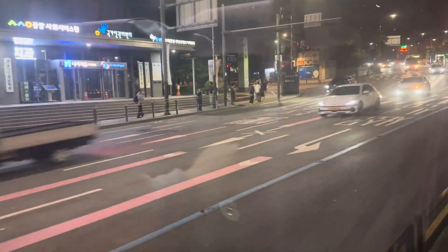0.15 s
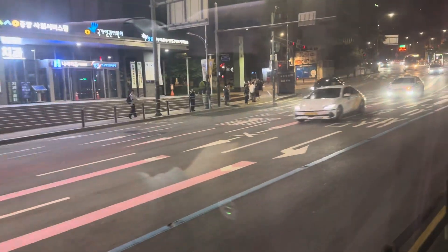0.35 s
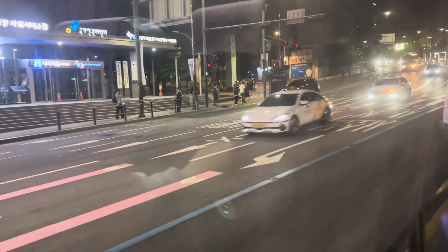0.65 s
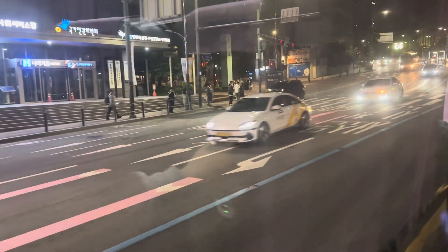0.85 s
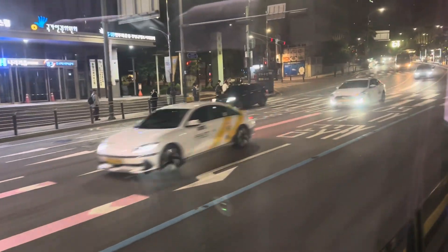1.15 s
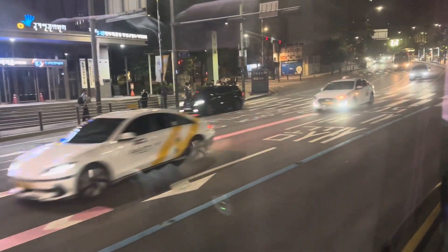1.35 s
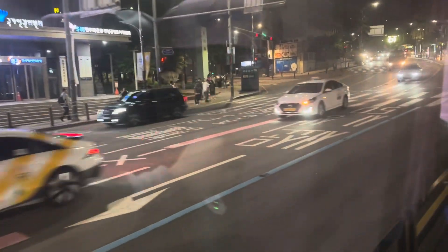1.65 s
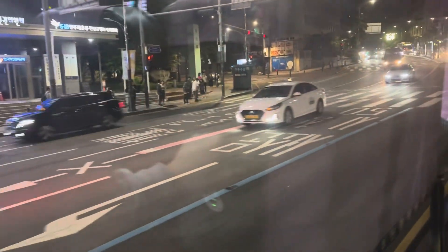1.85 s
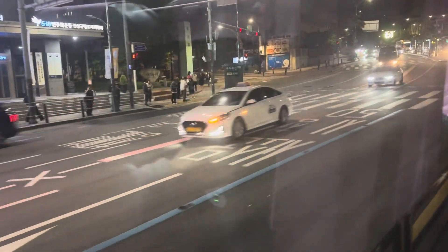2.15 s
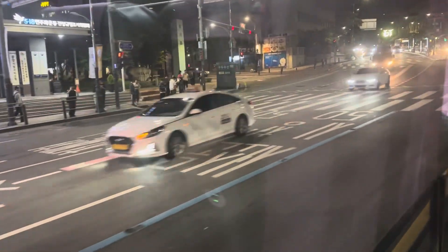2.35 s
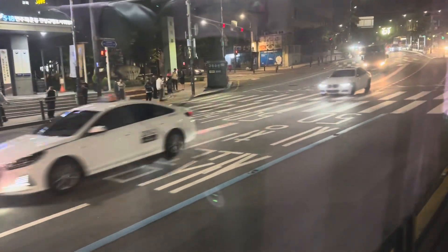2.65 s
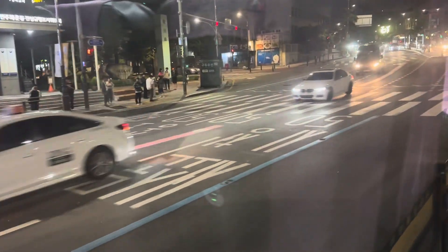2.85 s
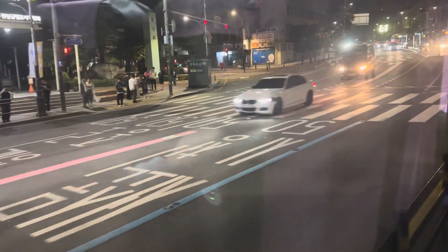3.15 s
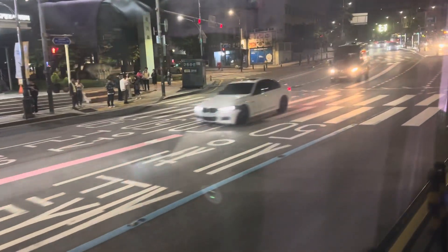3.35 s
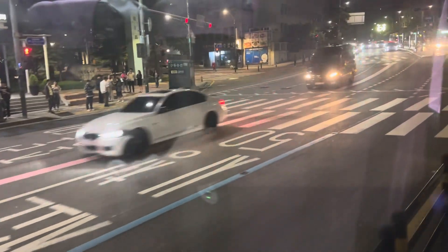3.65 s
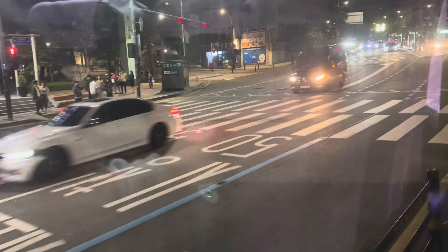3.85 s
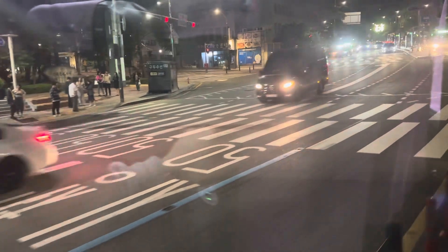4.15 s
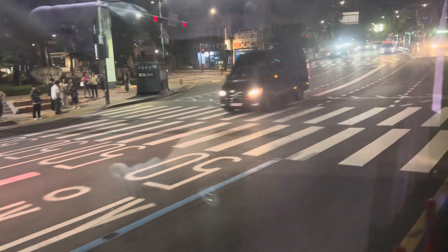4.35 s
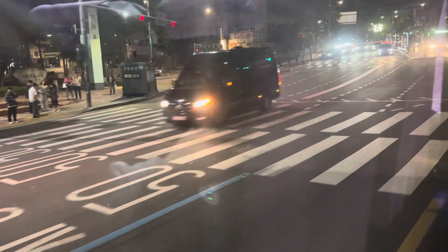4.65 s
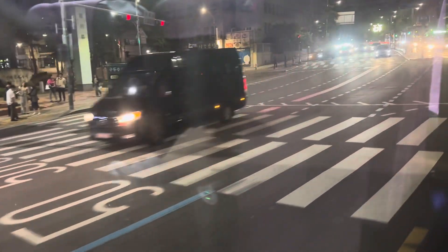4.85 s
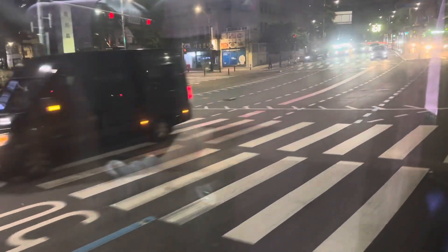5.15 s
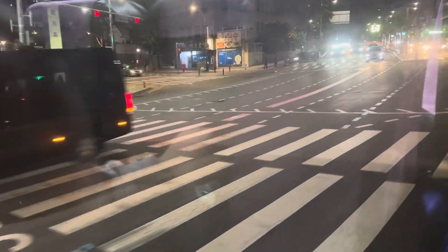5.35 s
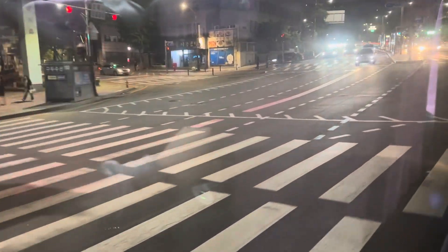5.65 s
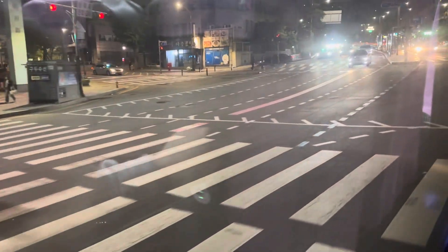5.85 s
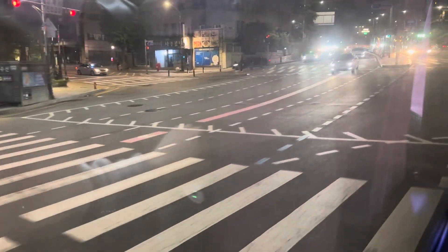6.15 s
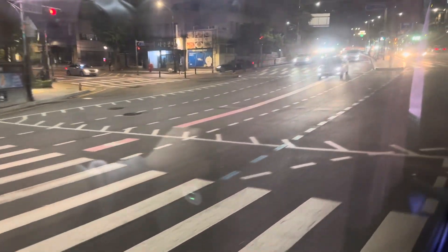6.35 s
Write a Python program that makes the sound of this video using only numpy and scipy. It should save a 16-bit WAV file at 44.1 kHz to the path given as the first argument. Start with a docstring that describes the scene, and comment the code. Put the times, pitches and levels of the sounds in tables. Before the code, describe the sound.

Inside a city bus, a diesel engine pulls hard with faint turbo whistle, changes gear with a breathy air release, then climbs again more quietly.

```python
"""A bus diesel pulls hard with its turbo whistling, changes gear with a rush of air, then climbs in the next gear.
Its tones are sines locked to the crank; its roar, clatter and hiss are coloured noise that follows the load.
The turbo is a narrow band of noise on a moving pitch, and the vented air is noise with sung tones.
Road rumble and cabin boom are low noise; fittings tick in noise bursts, panels knock in decaying modes,
and squeaks, whines and standing waves are wavering sines."""
import sys
import numpy as np
from scipy import signal
from scipy.fft import rfft, irfft
from scipy.io import wavfile
from scipy.ndimage import uniform_filter1d

SR = 44100
rng = np.random.default_rng(int(sys.argv[2]) if len(sys.argv) > 2 else 0)


def materialize(psi):
    """Save the field psi as 16-bit PCM at rate SR to the path in sys.argv[1].

    A 1-D psi becomes a single channel; in a 2-D psi each row is a channel.
    """
    bounded = np.clip(np.atleast_2d(psi).T, -1, 1)
    quanta = np.round(bounded * 32767).astype(np.int16)
    wavfile.write(sys.argv[1], SR, quanta)


N = 287091
TIME = np.arange(N) / SR
BINS_HZ = np.maximum(np.arange(N // 2 + 1) * SR / N, 1)


def from_db(db):
    """Decibels to gain."""
    return np.exp(np.log(10) / 20 * np.asarray(db))


def rms_one(x):
    """Scale so that the centre of the stereo image has rms 1."""
    centre = np.atleast_2d(x).mean(axis=0)
    return x / np.sqrt(np.mean(centre ** 2) + 1e-20)


def in_time(rows):
    """Each column of a curve, at every sample."""
    s, *columns = np.transpose(rows)
    return [np.interp(TIME, s, column) for column in columns]


def at_hz(points, hz):
    """Read a spectrum on a log-frequency axis."""
    point_hz, value = np.transpose(points)
    return np.interp(np.log(hz), np.log(point_hz), value)


def drift(rate_hz):
    """Slow random wander of rms 1, drawn at every 16th sample."""
    coarse = TIME[::16]
    hz = np.arange(len(coarse) // 2 + 1) * SR / N
    spectrum = rfft(rng.standard_normal(len(coarse))) / (1 + (hz / rate_hz) ** 2)
    slow = irfft(spectrum, len(coarse))
    return np.interp(TIME, coarse, rms_one(slow))


def swell(s, half_s):
    """A smooth bell-shaped rise and fall around a moment, down to 1/e at the half length."""
    return np.exp(-np.minimum(((TIME - s) / half_s) ** 2, 50))


def blow(s, t60_s, rise_s):
    """Envelope of a blow: a quick rise, then a steady decay by 60 dB in the ring time."""
    age = np.maximum(TIME - s, 0)
    decay = np.exp(-np.minimum(np.log(1000) * age / t60_s, 50))
    return (1 - np.exp(-age / rise_s)) * decay


def steadied(x, seconds):
    """Even out the slow swells of a narrow band of noise."""
    power = uniform_filter1d(np.mean(x ** 2, axis=0), max(int(seconds * SR), 1))
    return x * np.sqrt(np.mean(power) / (power + 0.012))


# Which side is louder. Each row: frequency in Hz, left minus right in dB.
LEAN = [(60, 3), (140, 0.5), (210, 5), (310, 5.5), (480, 7), (545, 10), (600, 4), (680, 4.5), (750, 1),
        (860, 6), (935, -0.5), (1130, 3.5), (1700, 3), (2600, 3), (5000, 5.5), (8500, 0), (14000, 0)]


def ears(hz):
    """Left and right gains at a frequency."""
    return from_db(at_hz(LEAN, hz) * np.array([[.5], [-.5]]))


def lift_db(modes, hz):
    """Lift given by a set of resonances, each a bell around its centre."""
    return sum(lift / (1 + (2 * (hz - centre) / width) ** 2) for centre, width, lift in modes)


# Cabin resonances. Each row: centre in Hz, width in Hz, lift in dB.
CABIN = [(112, 14, 6), (178, 22, 4), (307, 28, 4.5), (395, 16, 3), (492, 22, 8), (544, 16, 4), (585, 16, 7),
         (627, 18, 6), (748, 34, 7), (930, 40, 3.5), (1140, 40, 2)]
# How alike the two ears are. Each row: frequency in Hz, left-right likeness from -1 to 1.
LIKENESS = [(90, .99), (105, .8), (180, .85), (300, .68), (520, 0), (820, -.35), (1500, .37), (2600, .33),
            (5500, .42), (8300, -.93), (9700, -.93), (13000, .4)]


def cabin_noise(spectrum, modes=CABIN):
    """Stereo turbulence coloured by resonances: alike in the bass, mostly more diffuse higher up."""
    mid, side = rfft(rng.standard_normal((2, N)))
    alike = np.clip(at_hz(LIKENESS, BINS_HZ), -.99, .995)
    field = np.sqrt(1 + alike) * mid + np.sqrt(1 - alike) * side * [[1], [-1]]
    # the spectrum falls away steadily outside its first and last points
    low_skirt = np.minimum(BINS_HZ / spectrum[0][0], 1) ** 2
    high_skirt = np.minimum(spectrum[-1][0] / BINS_HZ, 1) ** 3
    colour = from_db(at_hz(spectrum, BINS_HZ) + lift_db(modes, BINS_HZ))
    return rms_one(irfft(field * low_skirt * high_skirt * ears(BINS_HZ) * colour, N))


def tone(hz, waver_hz, rough=0.31):
    """A tone whose pitch and strength waver, clear or blurred into a hiss, out of step at the two ears."""
    turns = np.cumsum(hz + waver_hz * drift(25 + 2 * waver_hz)) / SR
    angle = 2 * np.pi * (turns + rng.random())
    apart = np.arccos(np.clip(at_hz(LIKENESS, hz), -1, 1)) * np.array([[.5], [-.5]])
    strength = 1 + rough * drift(25 + waver_hz)
    return rms_one(strength * ears(hz) * np.sin(angle + apart))


def sung(rows):
    """Tones that each swell and fade on a pitch of their own."""
    return sum(from_db(db) * swell(s, half_s) * tone(hz, waver_hz) for s, half_s, hz, waver_hz, db in rows)


# the driver opens the throttle, the drive lets go, the next gear takes hold; each takes a moment
PULL_S, RELEASE_S, ENGAGE_S, SHIFT_TAKES_S = 0.14, 1.53, 3.49, 0.3


def by_gear(low, coasting, high):
    """A level that passes from the pull in the low gear through coasting to the next gear."""
    around = [-SHIFT_TAKES_S / 2, SHIFT_TAKES_S / 2]
    s = np.add.outer([PULL_S, RELEASE_S, ENGAGE_S], around).ravel()
    return np.interp(TIME, s, [coasting, low, low, coasting, coasting, high])


# Colour of the floor rumble. Each row: frequency in Hz, relative level in dB per Hz.
RUMBLE = [(18, -26), (28, -11.5), (40, -7.5), (56, 0.5), (66, -1), (85, -18), (130, -34)]
# Rough patches that swell the rumble. Each row: middle in seconds, half length in seconds, level in dB.
BUMPS = [(.62, 0.16, -26), (1.099, 0.087, -27.5), (1.6, 0.052, -27.5), (2.36, 0.17, -32), (2.8, .15, -35),
         (3.161, 0.024, -19.5), (3.449, 0.024, -21.5), (5.53, 0.05, -29), (6.279, 0.2, -33)]
RUMBLE_DB = -29  # on smooth road
# Colour of the cabin boom. Each row: frequency in Hz, relative level in dB per Hz.
BOOM = [(45, -24.5), (64, -9.5), (76, 7.5), (92, -13), (112, -9.5), (130, -11), (190, -33.5)]
# Level of the boom: in the low gear, coasting and in the next gear, in dB.
BOOM_DB = (-27, -29, -30)


def road():
    """The tyres shake the floor, harder on rough patches, and set the air of the cabin booming."""
    strength = from_db(RUMBLE_DB) + sum(from_db(db) * swell(s, half_s) for s, half_s, db in BUMPS)
    rumble = strength * steadied(cabin_noise(RUMBLE), 0.031)
    boom = from_db(by_gear(*BOOM_DB)) * steadied(cabin_noise(BOOM), .1)
    return rumble + boom


# Standing waves. Each row: middle in seconds, half length in seconds, pitch in Hz, waver in Hz, level in dB.
CABIN_TONES = [(.5, .22, 111, 2, -23.5), (1.2, .2, 113.3, 2, -26), (1.58, .16, 301.5, 1.8, -36),
               (1.55, .12, 478, 5, -46), (2.0, 0.093, 134.6, 2.2, -28), (2.01, 0.13, 113, 1.5, -29.5),
               (1.96, 0.087, 506, 2.9, -46.5), (2.88, 0.16, 370, 1.8, -48), (3.79, 0.29, 323, 2, -42),
               (4, .4, 490, 2.6, -50.5), (4.5, .7, 749.6, 5, -59), (4.8, 0.28, 263.8, 2.2, -42),
               (4.7, .25, 499, 3, -52), (5.7, .2, 544, 2, -55), (5.87, .09, 76, 2, -20),
               (6.7, 0.37, 640, 2.2, -54.5)]


def cabin_tones():
    """Standing waves of the cabin ring up as the engine sweeps past them."""
    return sung(CABIN_TONES)


# Thin hanging whines. Each row: middle in seconds, half length in seconds, pitch in Hz, waver in Hz,
# relative level in dB.
WHINES = [(3.7, 0.82, 2665, 11, -76), (4.3, 0.64, 3800, 8, -80), (5.41, 0.26, 2675, 13, -70),
          (5.35, .22, 3670, 11, -77)]


def whines(flicker_db=2.5):
    """Faint high tones that come and go, their strength flickering together."""
    return from_db(flicker_db * drift(12)) * sung(WHINES)


# Trim squeaks. Each row: middle in seconds, half length in seconds, pitch in Hz, waver in Hz, level in dB.
SQUEAKS = [(.07, .023, 7400, 100, -65), (.148, .01, 7440, 66, -69), (.84, .03, 1573, 8, -45.5),
           (1.445, .012, 7330, 380, -53.5), (1.72, .1, 2690, 25, -70), (2.618, .02, 6570, 46, -66),
           (2.91, .04, 5300, 223, -69), (2.94, .03, 4250, 340, -64), (3.18, .08, 2670, 10, -70.5),
           (3.55, .1, 2885, 8.6, -74), (3.7, .08, 3170, 7.4, -72), (3.78, .055, 2650, 12, -71),
           (4.0, .05, 3175, 9.2, -71.5), (4.23, .05, 2650, 12, -66.5), (4.48, .055, 3180, 12, -77),
           (4.65, .05, 2815, 10, -70.5), (4.82, .06, 2795, 8.8, -70), (4.66, .03, 3175, 10, -72),
           (4.98, .03, 2900, 35, -70), (4.87, .04, 3175, 11, -69), (5.8, .1, 4360, 22, -77.5),
           (6.16, .12, 3390, 16, -72.5), (6.3, .05, 4560, 15, -75.5)]


def squeaks():
    """Squeaks and squeals of the trim: short tones on wavering pitches."""
    return sung(SQUEAKS)


# Shudders over a seam in the road. Each row: middle in seconds, half length in seconds, relative level in dB.
SHUDDERS = [(5.561, .05, -41.5)]
# Colour of the trim. Each row: frequency in Hz, relative level in dB per Hz.
TRIM = [(300, -4), (500, 3), (760, 8), (1000, -16), (1500, -12), (2200, -21), (3200, -29), (5700, -31),
        (7500, -39)]


def shudders(grain_db=1.0):
    """The trim rattles softly, in a blur of small contacts made of grainy noise."""
    strength = sum(from_db(db) * swell(s, half_s) for s, half_s, db in SHUDDERS)
    return strength * from_db(grain_db * drift(90)) * cabin_noise(TRIM)


# Body knocks over bumps. Each row: start in seconds, relative level in dB, ring time in seconds, centre in Hz.
KNOCKS = [(1.189, -11.5, 0.083, 180), (3.044, -37.5, 0.15, 600), (3.066, -23.5, 0.095, 260),
          (3.078, -33.5, 0.12, 540), (3.099, -18, 0.058, 150), (5.54, -38.5, .26, 500)]
# Modes of the large panels. Each row: frequency in Hz, relative level in dB.
PANEL = [(128, -3), (172, 3.5), (250, -1.5), (322, 0), (494, -2.5), (581, -1), (680, -10), (780, -20.5),
         (942, -6), (1206, -11)]


def knocks(spread_octaves=.7, rise_s=.0012, size=16384):
    """Large panels answer bumps with a dull knock, ringing most in the modes near its centre."""
    out = np.zeros((2, N))
    for s, db, t60_s, centre in KNOCKS:
        part = slice(int(s * SR), int(s * SR) + size)
        age = TIME[part] - s
        ring = 0
        for k, (hz, level_db) in enumerate(PANEL):
            closeness = 1 / (1 + (np.log2(hz / centre) / spread_octaves) ** 2)
            strength = from_db(level_db + rng.normal()) * closeness  # no two knocks alike
            # neighbouring modes start in opposite directions
            ring = ring + strength * ears(hz) * np.sin(2 * np.pi * hz * age) * (-1) ** k
        out[:, part] += from_db(db) * blow(s, t60_s, rise_s)[part] * ring
    return out


# Ticks of loose fittings. Each row: start in seconds, relative level in dB, ring time in seconds,
# centre in Hz, spread in octaves, rise in seconds.
TICKS = [(.079, -48.5, .04, 14900, .13, .0006), (.08, -57, .05, 7100, .12, .001),
         (.56, -62, .073, 15000, .12, .002), (1.412, -46, 0.054, 9500, 1, .002),
         (1.44, -59.5, 0.4, 11500, 1.3, .002), (2.186, -44.5, 0.032, 6500, 1.7, .0007),
         (2.59, -67, .3, 12000, .8, .006), (2.818, -55, 0.18, 5000, 0.94, .0008),
         (2.82, -53.5, 0.11, 1650, .3, .001), (2.91, -63, 0.37, 6500, 1, .02),
         (3.101, -50, .04, 7440, 1.7, .001), (3.39, -69.5, 0.28, 12200, .7, .003),
         (3.96, -55, 0.062, 6170, .35, 0.00097), (5.22, -66.5, 0.32, 6500, .6, .01),
         (5.538, -50.5, 0.25, 1520, 0.16, .003), (5.537, -62.5, 0.28, 5200, 0.67, .008),
         (6.16, -61, 0.33, 8900, 1.5, 0.014), (6.39, -64.5, 0.23, 10800, 1.1, .005)]
# Colour of the chatter. Each row: frequency in Hz, relative level in dB per Hz.
FITTING = [(600, -23), (1600, 14.5), (3500, -2), (5500, -6), (7500, -3.5), (9500, -3), (15000, -10.5),
           (17000, -13.5)]
TICK_TAIL_DB, TICK_TAIL_S = -19.5, 0.31   # the cabin answers each tick: level against it, ring time


def fittings(chatter_db=1.5, tick_db=1.5, size=16384):
    """Small parts tick and chatter: bursts of grainy noise, each in its own range."""
    grain = cabin_noise(FITTING) * from_db(chatter_db * drift(150))
    out = np.zeros((2, N))
    hz = np.maximum(np.arange(size // 2 + 1) * SR / size, 1)
    for s, db, t60_s, centre, spread, rise_s in TICKS:
        part = slice(int(s * SR), int(s * SR) + size)
        colour = 1 / (1 + (np.log2(hz / centre) / spread) ** 4)
        chatter = irfft(rfft(grain[:, part], size) * colour, size)[:, :len(TIME[part])]
        tail = from_db(TICK_TAIL_DB) * blow(s, TICK_TAIL_S, rise_s)
        envelope = blow(s, t60_s, rise_s) + tail
        out[:, part] += from_db(db + tick_db) * envelope[part] * rms_one(chatter)
    return out


# Resonances of the air passage. Each row: centre in Hz, width in Hz, lift in dB.
PASSAGE = [(236, 25, 4), (328, 30, 3), (485, 50, 3), (590, 40, 3), (920, 50, 6), (1140, 40, 3)]
# Colour of the rush. Each row: frequency in Hz, relative level in dB per Hz.
RUSH = [(170, -23), (310, -1), (460, -1.5), (600, -7.5), (780, -8.5), (930, -19.5), (1100, -20.5),
        (1600, -26), (2400, -48), (5000, -64)]
# Colour of the hiss on top. Each row: frequency in Hz, relative level in dB per Hz.
AIR_HISS = [(1000, -17.5), (2000, 2), (3000, -4), (4900, -13), (5700, -4), (6500, -14.5), (8000, -15),
            (11000, -34), (16000, -31)]
# The air sings on one mode of its passage after another. Each row: middle in seconds, half length in seconds,
# pitch in Hz, waver in Hz, level in dB.
AIR_TONES = [(2.315, 0.066, 487, 14, -25.5), (2.352, 0.035, 448, 6.9, -21), (2.385, 0.063, 931, 8, -31),
             (2.39, 0.021, 1148, 8.3, -41.5), (2.42, 0.099, 320, 10.1, -24), (2.405, 0.035, 570, 40, -26),
             (2.465, 0.037, 488, 8, -21.5), (2.462, 0.038, 897, 7.5, -35), (2.57, 0.06, 184, 3, -26.5),
             (2.64, 0.074, 303.3, 2.4, -34)]
# vented in the gear change: the valve opens, the flow peaks, the valve shuts
AIR_OPEN_S, AIR_PEAK_S, AIR_SHUT_S = 2.185, 2.405, 2.473
AIR_SWELL_S, AIR_RELEASE_S = 0.13, 0.11   # half length of the swell; decay once shut
HISS_LEAD_S = .012   # the hiss peaks a little before the rush
BUFFET_LAG_S, BUFFET_SWELL_S = 0.036, 0.15   # the low buffeting comes later and lasts longer


def air_release(buffet_db=-15.5, rush_db=-19.5, hiss_db=-47.0, hiss_half_s=0.15, gust_db=0.5, grit_db=1.05):
    """A short rush of air swells and fades, singing in its passage, hissing on top and buffeting below."""
    opened = np.clip((TIME - AIR_OPEN_S) / 0.04, 0, 1)
    closing = np.exp(-np.maximum(TIME - AIR_SHUT_S, 0) / AIR_RELEASE_S)
    # Hz, relative dB per Hz
    buffet_colour = [(70, -24), (108, 2.0), (160, 0.5), (235, -10.0), (320, -11.5)]
    low = steadied(cabin_noise(buffet_colour, PASSAGE), 0.051)
    buffet = from_db(buffet_db) * swell(AIR_PEAK_S + BUFFET_LAG_S, BUFFET_SWELL_S) * low
    rush = from_db(rush_db) * swell(AIR_PEAK_S, AIR_SWELL_S) * steadied(cabin_noise(RUSH, PASSAGE), 0.05)
    hiss = from_db(hiss_db) * swell(AIR_PEAK_S - HISS_LEAD_S, hiss_half_s) * cabin_noise(AIR_HISS)
    gusts = from_db(gust_db * drift(22) + grit_db * drift(160))
    # the buffeting dies away half as fast as the rest
    flow = buffet * np.sqrt(closing) + closing * gusts * (rush + hiss)
    return opened * flow + sung(AIR_TONES)


# Turbocharger. Each row: time in seconds, whistle pitch in Hz, relative level in dB.
TURBO = [(0, 8640, -99), (.55, 9530, -72.5), (.8, 10100, -75), (1.1, 11200, -70), (1.38, 11800, -72.5),
         (1.55, 11640, -97), (3.2, 6380, -86), (4.2, 7070, -77.5), (4.9, 7170, -78), (5.6, 7800, -87.5),
         (6.51, 8430, -94.5)]


def turbo(width_hz=220, level_db=1.5, flutter_db=2.5):
    """A breathy, fluttering whistle on the turbine speed: a narrow band of noise, different at each ear."""
    hz, db = in_time(TURBO)
    angle = 2 * np.pi * np.cumsum(hz) / SR
    sine, cosine = np.sin(angle), np.cos(angle)
    whistle = np.array([drift(width_hz) * sine + drift(width_hz) * cosine for _ in range(2)])
    return from_db(db + level_db + flutter_db * drift(14)) * whistle


# Deep tone of the drive line. Each row: time in seconds, pitch in Hz, relative level in dB.
DRIVE_TONE = [(0, 52, -40), (.25, 54, -27), (.5, 56, -20.5), (.62, 59, -21), (.75, 67, -19), (.95, 71, -24),
              (1.15, 74, -20.5), (1.35, 76, -23), (1.55, 80, -18.5), (1.7, 82, -26), (1.85, 83, -45),
              (2.1, 83, -100)]


def drive_tone(surge_db=2.0):
    """The drive line hums lower than the firings and climbs until the gear is let go."""
    hz, db = in_time(DRIVE_TONE)
    angle = 2 * np.pi * (np.cumsum(hz) / SR + rng.random())
    return from_db(db + surge_db * drift(8)) * np.sqrt(2) * np.sin(angle) * ears(hz.mean())


# Pace of the judder under load. Each row: time in seconds, throbs per second.
JUDDER_RATE = [(0, 8.9), (.6, 8.9), (.65, 9.85), (1.4, 11.1)]
FIRST_THROB_S, THROB_HALF_S = .065, 0.015


def throbs():
    """The judder of the drive as a train of soft pulses of height 1."""
    rate, = in_time(JUDDER_RATE)
    count = np.cumsum(rate) / SR - FIRST_THROB_S * rate[0]
    from_nearest_s = (count - np.round(count)) / rate
    return np.exp(-(from_nearest_s / THROB_HALF_S) ** 2)


# Strength of the throbs. Each row: time in seconds, level in dB.
JUDDER = [(0, -24.5), (.5, -25), (.65, -33), (.83, -24), (1.3, -18.5), (1.4, -28.5), (1.48, -58),
          (1.7, -100)]
THROB_HZ = 310.3


def judder():
    """Each throb of the drive sets one mode of the cabin booming briefly."""
    db, = in_time(JUDDER)
    return from_db(db) * throbs() * tone(THROB_HZ, 7)


def engine_order(multiple, crank_hz, turn, rough):
    """One harmonic of the engine; uneven combustion shakes its strength and timing."""
    angle = multiple * turn + rng.uniform(0, 2 * np.pi)
    steady = (1 + rough * drift(19)) * np.sin(angle)
    shaken = rough * drift(22.0) * np.cos(angle)
    return np.sqrt(2) * (steady + shaken) * ears(multiple * crank_hz.mean())


# Firing tone, swelling as it meets the standing waves of the cabin. Each row: time in seconds,
# level in dB before its surges.
HUM = [(0, -26), (1.1, -40.5), (1.45, -37), (1.6, -28.5), (1.75, -24.5), (1.9, -20.5), (2.0, -28.5),
       (2.12, -21), (2.3, -23), (2.5, -26.5), (2.74, -21), (3.1, -33.5), (3.4, -48.5), (3.7, -20.5),
       (3.87, -16.5), (4.1, -35.5), (4.3, -25.5), (4.6, -20.5), (4.95, -36), (5.3, -28), (5.6, -29),
       (5.86, -25), (5.97, -27), (6.1, -21), (6.35, -18), (6.51, -20)]
HUM_SURGE_DB = 1.6  # the firing tone surges a little by chance
# Drone an octave above the firing tone, as the engine pulls. Each row: time in seconds, reference level in dB.
DRONE = [(0, -25), (.24, -33), (.35, -22), (.48, -24), (.63, -27), (.77, -19), (.95, -23.5), (1.1, -29),
         (1.3, -30.5), (1.47, -26.5), (1.62, -40), (3.3, -41), (4.2, -54), (6.51, -49.5)]
# The drone and its overtones. Each row: multiple of the crank rate, roughness from 0 to 1,
# level in dB against the drone's reference.
DRONE_ORDERS = [(6, .2, 0.7), (12, .5, -15), (17.9, .7, -24)]
# Tones of the engine and of the shafts and pumps it drives. Each row: multiple of the crank rate,
# roughness from 0 to 1, level in dB in the low gear, level in dB coasting, level in dB in the next gear.
ORDERS = [(1.5, 0.03, -44, -41, -29), (2, 0.2, -35, -35.5, -44.5), (2.45, .25, -35.5, -34.5, -32.5),
          (3.2, 0.2, -35, -45, -44.5), (3.65, .35, -36.5, -44, -52), (4, .2, -41.5, -40, -40),
          (5, .25, -44.5, -43, -45), (8.25, 0.1, -43.5, -49.5, -51), (8.65, .2, -42, -52.5, -53),
          (9, 0.2, -43.5, -51.5, -51), (9.55, .75, -45.5, -48.5, -45.5), (12.9, .4, -50.5, -54.5, -50),
          (18.45, 0.3, -48.5, -57.5, -55)]


def exhaust(turn, crank_hz, firing_rough=.1):
    """The firing tone, three to a turn, the drone above it, and other orders as strong as the gear makes them."""
    hum_db, = in_time(HUM)
    drone_db, = in_time(DRONE)
    out = from_db(hum_db + HUM_SURGE_DB * drift(7)) * engine_order(3, crank_hz, turn, firing_rough)
    for multiple, rough, db in DRONE_ORDERS:
        out += from_db(drone_db + db) * engine_order(multiple, crank_hz, turn, rough)
    for multiple, rough, *levels_db in ORDERS:
        out += from_db(by_gear(*levels_db)) * engine_order(multiple, crank_hz, turn, rough)
    return out


# Engine speed. Each row: time in seconds, crank turns per second.
REVS = [(0, 28.2), (.3, 28.7), (.8, 33.4), (1.3, 37.2), (1.45, 33.3), (1.6, 27.2), (1.8, 27.8),
        (2.05, 25.8), (2.3, 22.2), (2.7, 25.6), (2.95, 25.3), (3.3, 23), (4.1, 26.2), (4.5, 26.2),
        (5.4, 28.8), (5.7, 30.7), (6.3, 33.1), (6.51, 32.9)]
# Engine load, as the relative level of its roar. Each row: time in seconds, level in dB.
LOAD = [(0, -24.5), (.6, -23.5), (1.3, -22.5), (1.7, -29.5), (2.1, -31), (2.95, -34.5), (3.3, -33.5),
        (6.51, -32.5)]
# Colour of the roar. Each row: frequency in Hz, relative level in dB per Hz.
ROAR = [(80, -21.5), (120, 2), (150, -2.5), (175, -1.5), (240, -7.5), (275, -9.5), (320, -10), (400, -14.5),
        (520, -23.5), (800, -32.5)]
# Colour of the clatter. Each row: frequency in Hz, relative level in dB per Hz.
CLATTER = [(280, -19.5), (450, -1.5), (580, -2), (750, -3.5), (1000, -8.5), (1500, -14.5), (2000, -22.5),
           (2700, -28), (4000, -64), (7000, -59)]
# Colour of the hiss. Each row: frequency in Hz, relative level in dB per Hz.
HISS = [(1500, -2), (3000, -1.5), (4500, -5.5), (5600, -5), (7000, -3.5), (8300, -4), (10500, -12),
        (13000, -14.5), (16000, -21.5)]
# The hiss dips briefly. Each row: middle in seconds, half length in seconds, depth in dB.
HISS_DIPS = [(2.77, 0.052, -3.5), (3.04, 0.035, -3)]
# clatter and hiss: reference level at full load, and the share of the roar's swing that they follow
FULL_LOAD_DB = -22
CLATTER_DB, CLATTER_FOLLOWS = -38, 0.78
HISS_DB, HISS_FOLLOWS = -61.5, 0.41
# depth of the throb in roar and clatter at full load, and how far below full load it dies out
ROAR_THROB_DB, CLATTER_THROB_DB, THROB_RANGE_DB = 3.2, 3.6, 4


def diesel(roar_db=0.88, surge_db=1.0, throb=0.36, knock=0.17):
    """Crank-locked tones, with roar, clatter and hiss that follow the load and pulse with the engine's turns."""
    crank_hz, = in_time(REVS)
    load_roar_db, = in_time(LOAD)
    load_db = load_roar_db - FULL_LOAD_DB
    turn = 2 * np.pi * np.cumsum(crank_hz) / SR
    tones = exhaust(turn, crank_hz)

    # the roar pulses at half the firing rate, clatter and hiss with each firing
    bank, firing = np.cos(1.5 * turn), np.cos(3 * turn)
    pulse = throbs()
    shake = (pulse - pulse.mean()) * np.clip(1 + load_db / THROB_RANGE_DB, 0, 1)

    roar_level = load_roar_db + roar_db + ROAR_THROB_DB * shake + surge_db * drift(4.5)
    roar = from_db(roar_level) * (1 + throb * bank) * steadied(cabin_noise(ROAR), 0.088)

    clatter_level = CLATTER_DB + CLATTER_FOLLOWS * load_db + CLATTER_THROB_DB * shake + drift(23)
    clatter = from_db(clatter_level) * (1 + knock * firing) * cabin_noise(CLATTER)

    dips_db = sum(db * swell(s, half_s) for s, half_s, db in HISS_DIPS)
    hiss_level = HISS_DB + HISS_FOLLOWS * load_db + dips_db + .5 * drift(25)
    hiss = from_db(hiss_level) * (1 + 0.14 * firing) * cabin_noise(HISS)
    return tones + roar + clatter + hiss


def scene():
    """Everything heard inside the bus, from the road up to the engine."""
    cabin = road() + cabin_tones() + whines()
    loose_parts = squeaks() + shudders() + knocks() + fittings()
    drive = air_release() + turbo() + drive_tone() + judder() + diesel()
    return cabin + loose_parts + drive


LOW_CUT_HZ, CUTOFF_HZ = 24, 15700


def record(dry):
    """The sound opens and closes with short fades; the deepest rumble is lost and the top is cut steeply."""
    low_cut = signal.butter(4, LOW_CUT_HZ, "high", fs=SR, output="sos")
    top_cut = signal.ellip(10, .1, 80, CUTOFF_HZ, fs=SR, output="sos")
    fade = np.minimum(1, np.minimum(TIME, TIME[-1] - TIME) / .004)  # 4 ms at each end
    return signal.sosfilt(top_cut, signal.sosfilt(low_cut, dry) * fade)


dry = scene()
out = record(dry)
materialize(out)
```